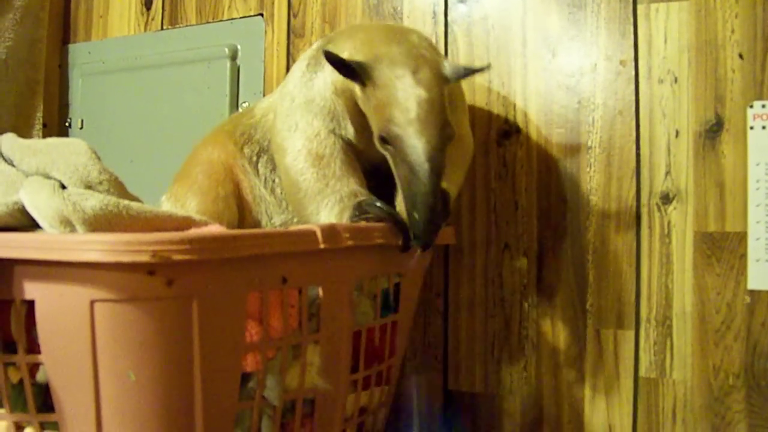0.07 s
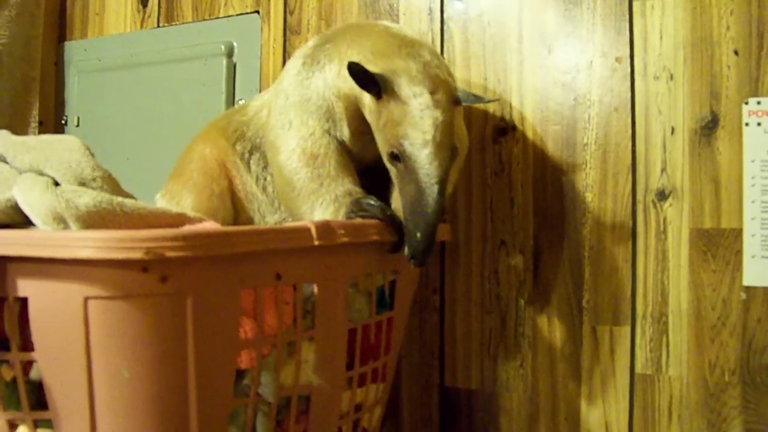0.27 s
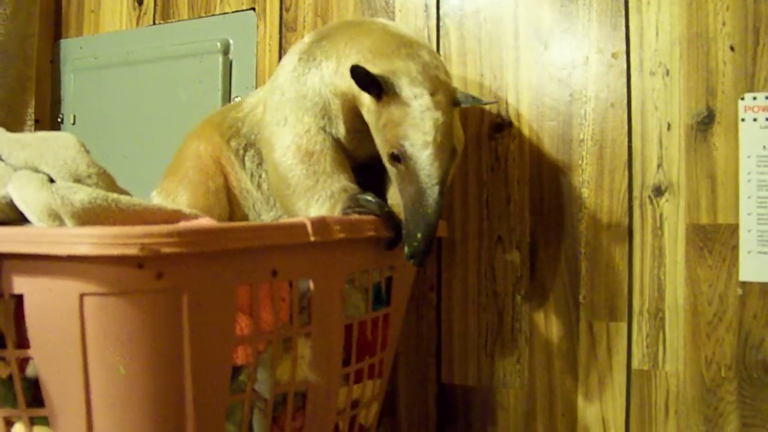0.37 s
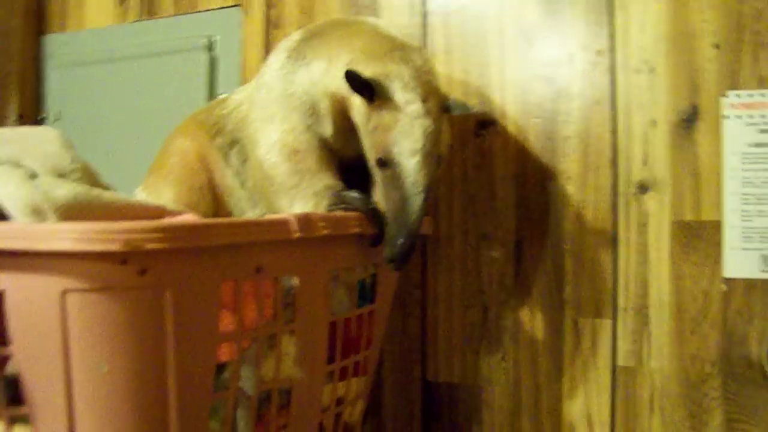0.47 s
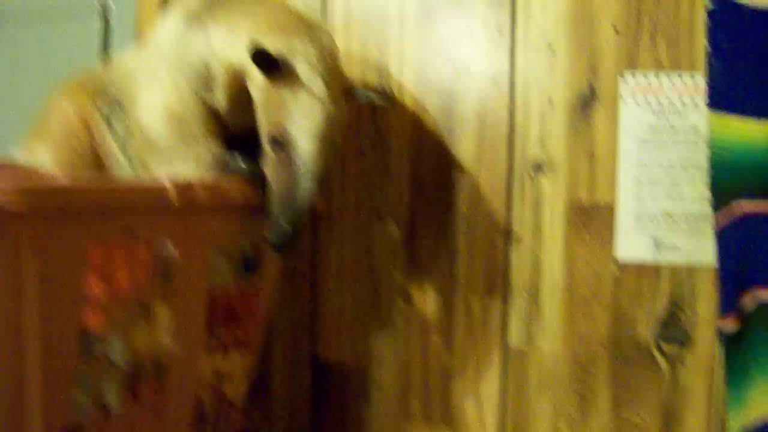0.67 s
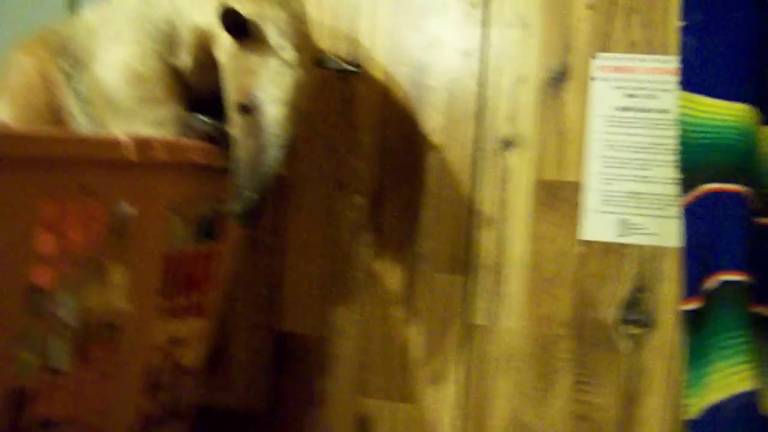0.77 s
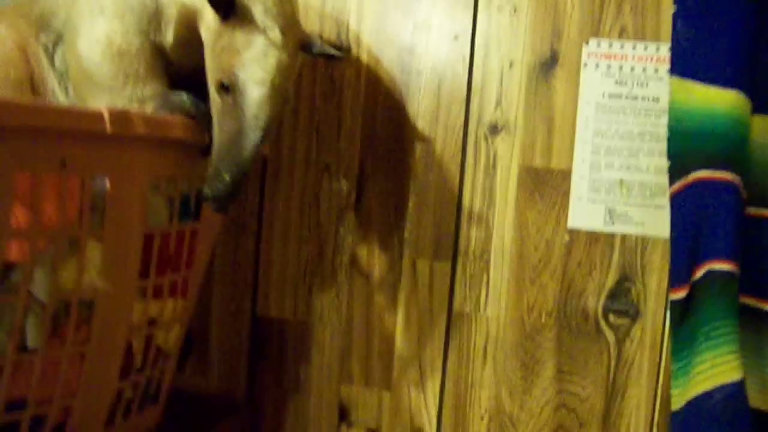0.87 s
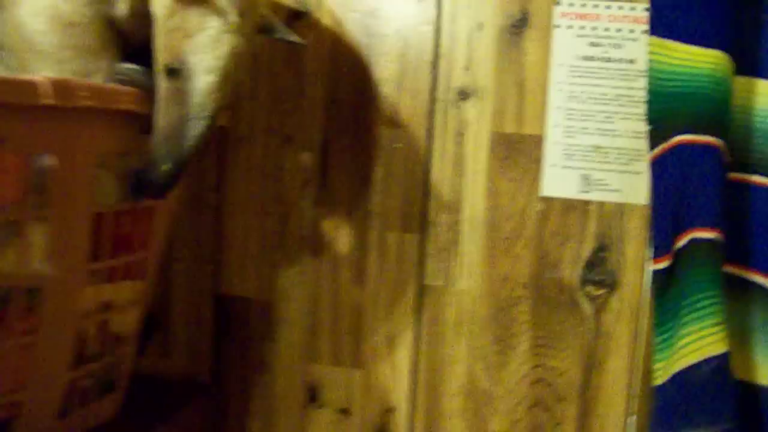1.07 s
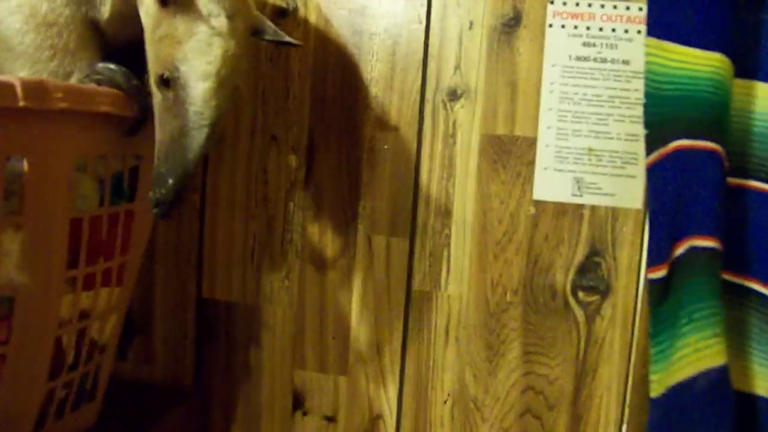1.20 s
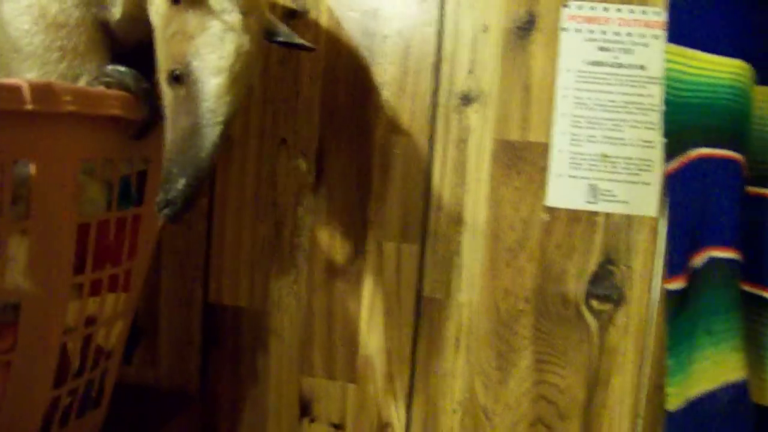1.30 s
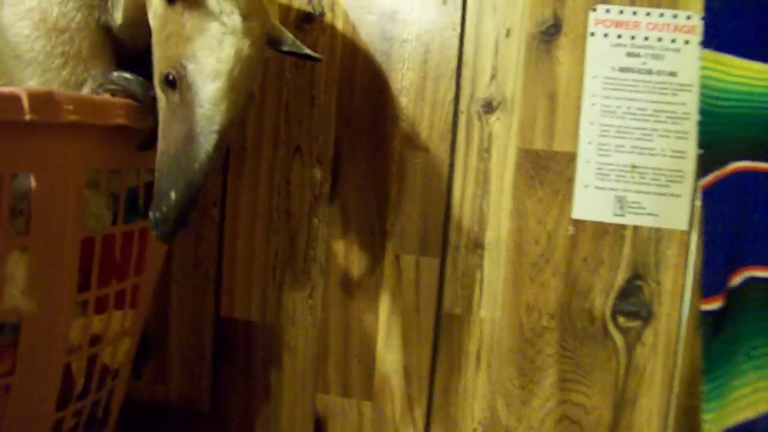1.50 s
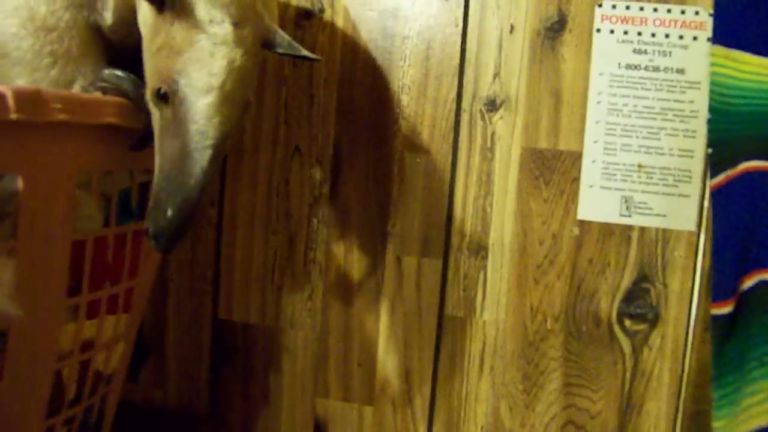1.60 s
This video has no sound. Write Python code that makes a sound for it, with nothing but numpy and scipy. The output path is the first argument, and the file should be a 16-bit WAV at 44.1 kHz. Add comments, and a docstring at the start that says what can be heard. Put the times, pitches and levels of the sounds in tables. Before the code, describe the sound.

An empty plastic bottle hits a hard floor at about 0.2 seconds and again near 0.5, with loud, hollow knocks that overload the microphone. It bounces more lightly and skids around 0.7 to 0.9 seconds, knocks again, then rattles quickly on its side, weakening until about 1.6 seconds. The small room adds a short echo, with a soft hush and a faint steady whine behind.

```python
"""An empty plastic bottle falls on a hard floor, bounces end over end and rattles on its side.
Each knock is a crack of the thin wall with a brief ring at the struck spot; the air inside answers
with a hollow note and the floor booms. Between bounces the bottle skids. The small, quiet room
echoes, a faint steady whine lies behind it all, and the two hardest knocks overload the microphone."""
import sys
import numpy as np
from scipy import signal
from scipy.fft import rfft, irfft
from scipy.io import wavfile
from scipy.ndimage import uniform_filter1d

SR = 44100
rng = np.random.default_rng(int(sys.argv[2]) if len(sys.argv) > 2 else 0)


def file_out(sig):
    """Save sig as 16-bit WAV at sys.argv[1]."""
    # one column per channel
    cols = np.atleast_2d(sig).T
    # limit, then scale
    lim = np.clip(cols, -1, 1)
    pcm = np.round(lim * 32767).astype(np.int16)
    wavfile.write(sys.argv[1], SR, pcm)


N = 72765
SIDES = np.array([[1], [-1]])  # left, right; a positive pan is louder on the left


def amp(db):
    """Turns decibels into a gain."""
    return 10 ** (np.asarray(db) / 20)


def read(points, hz):
    """Reads between a table's rows on a log-frequency axis."""
    f, value = np.transpose(points)
    return np.interp(np.log(hz + 1), np.log(f + 1), value)


def add(mix, start_s, sound):
    """Mixes a stereo sound in at a given time."""
    part = mix[:, round(start_s * SR):][:, :sound.shape[1]]
    part += sound[:, :part.shape[1]]


def causal(gain):
    """A filter with these gains that never sounds before the hit (minimum phase)."""
    log_gain = np.log(np.maximum(np.r_[gain, gain[-2:0:-1]], 1e-5))
    return np.exp(np.conj(signal.hilbert(log_gain)))[:len(gain)]


def rise(t, rise_s):
    """Swells from silence to full level."""
    return 1 - np.exp(-t / rise_s)


def fade(t, fade_s):
    """Dies away, losing 60 dB in each fade time."""
    return np.exp(-np.log(1000) * t / fade_s)


def ring(tones, t):
    """A sum of dying pure tones."""
    return sum(amp(db) * fade(t, fade_s) * np.sin(2 * np.pi * hz * t) for hz, db, fade_s in tones)


def low_pass(x, hz):
    """Cuts away the treble above a frequency."""
    return signal.oaconvolve(x, signal.firwin(121, hz, window=("kaiser", 8), fs=SR)[None], "same")


# how alike the room sounds on the left and right (frequency [Hz], likeness [0 to 1])
LIKENESS = [(100, 0.99), (500, 0.92), (1200, 0.29), (2500, 0), (7000, 0.091)]
def surround(a, b, hz):
    """Blends two unrelated noise spectra into sound that comes from all around."""
    same = np.clip(read(LIKENESS, hz), -1, 1)
    return np.array([a, same * a + np.sqrt(1 - same ** 2) * b])


# tone colour of the room's hush (frequency [Hz], relative level [dB])
HUSH_COLOUR = [(10, -19), (22, 1), (40, -14), (70, -13.5), (150, -23.5), (230, -13), (295, -29), (400, -19),
               (530, -18.5), (950, -23), (1300, -20.5), (1700, -29), (3300, -26.5), (5000, -35.5),
               (7200, -38), (8300, -58)]
def background(hush_db=-46.5, whine_hz=1249.5, whine_db=-50):
    """The room's soft hush and a thin steady whine."""
    hz = np.fft.rfftfreq(N, 1 / SR)
    noise = surround(*rfft(rng.standard_normal((2, N))), hz)
    hush = irfft(noise * amp(read(HUSH_COLOUR, hz)), N)
    whine = np.sqrt(2) * np.sin(2 * np.pi * whine_hz * np.arange(N) / SR)
    return amp(hush_db) * hush / hush.std() + amp(whine_db) * whine


# how long the room rings (frequency [Hz], fade time [s])
ROOM_FADE = [(100, 1), (260, 0.29), (700, 0.52), (2000, 0.42), (4500, 0.36), (7500, 0.37)]
# tone colour of that ringing (frequency [Hz], level [dB])
ROOM_COLOUR = [(100, 0), (170, 0), (290, -2.5), (370, -5), (600, -11.5), (1000, -8.5), (2000, -9),
               (4500, -13), (6500, -9.5), (8200, -17)]
def room(sound, onset_s=0.0095, pan_db=1):
    """Many echoes blur into a tail, each frequency dying at its own speed."""
    hz, t, noise = signal.stft(rng.standard_normal((2, SR)), SR, nperseg=512)
    hz = hz[:, None]
    fade_s = read(ROOM_FADE, hz)
    gain = amp(read(ROOM_COLOUR, hz)) * np.sqrt(2 * np.log(1000) / (fade_s * SR))
    tail = signal.istft(surround(*noise, hz) * fade(t, fade_s) * gain, SR, nperseg=512)[1]
    tail *= np.clip(np.arange(tail.shape[1]) / (onset_s * SR) - .5, 0, 1)
    return signal.fftconvolve(sound.mean(0)[None], tail, axes=1)[:, :N] * amp(SIDES * pan_db / 2)


# loudness of the skid (time [s], level [dB])
SKID_LEVEL = [(0.658, -54.5), (.70, -47), (0.719, -58), (.755, -76), (0.766, -38), (0.792, -48.5),
              (.83, -49.5), (0.882, -56), (0.899, -65)]
# its tone colour (frequency [Hz], relative level [dB])
SLIP_COLOUR = [(300, -28), (1500, 6.5), (3000, 3.5), (5200, 6.5), (7200, -1), (8300, -24)]
def skid(slips_per_s=2200, spread_db=4, pan_db=10):
    """Between bounces the plastic slides over the floor in many tiny slips."""
    slips = (rng.random(N) < slips_per_s / SR) * rng.choice([-1, 1], N)
    strength = amp(spread_db * np.minimum(rng.exponential(1, N), 3))
    colour = amp(read(SLIP_COLOUR, np.fft.rfftfreq(N, 1 / SR)))
    grit = irfft(rfft(slips * strength) * colour, N)
    level = amp(np.interp(np.arange(N) / SR, *np.transpose(SKID_LEVEL), left=-120, right=-120))
    return grit / grit.std() * level * amp(SIDES * pan_db / 2)


# the floor's tones (pitch [Hz], level relative to the thud [dB], fade time [s])
FLOOR_TONES = [(98.4, -65.5, 0.59), (123.5, -58.5, 0.13), (144.3, -63, 0.18)]
def floor_boom(t, thud_db):
    """The struck floor booms under the thud."""
    return amp(thud_db) * ring(FLOOR_TONES, t)


# the hollow bottle's higher tones, one list per column
# (pitch [Hz], level relative to the blow's body band [dB], fade time [s])
BODY_HZ = [347, 553, 712, 878, 1097, 1339]
BODY_DB = [-53, -58.5, -55, -60, -56, -62]
BODY_FADE_S = [0.34, 0.19, 0.24, 0.16, 0.33, .3]
def hollow_body(t, body_db):
    """The hollow bottle rings on softly after a blow."""
    return amp(body_db) * ring(zip(BODY_HZ, BODY_DB, BODY_FADE_S), t)


# tones of the air in the neck (pitch [Hz], relative level [dB], fade time [s])
AIR_TONES = [(185.53, 1.5, 0.47), (211.8, -8, 0.27), (141.7, -11.5, 0.36)]
def air_note(t, swell, apart_rad=0.083):
    """Spectrum of the air swinging in the neck, left and right slightly out of step."""
    return rfft(ring(AIR_TONES, t) * swell) * np.exp(.5j * SIDES * apart_rad)


# tones of the thin wall (pitch [Hz], relative level [dB], fade time [s])
WALL_TONES = [(1313, 11.5, 0.13), (1701.4, 10, 0.12), (2120, 0, .12), (2290, -4.5, .12), (2796, 6, 0.13),
              (2970, -1, .14), (3240, -0.5, 0.19), (4260, -5.5, .08), (3980, -10, 0.067)]
def wall_ring(t, wall_db, spot_tones, softness, base_rise_s=0.00078):
    """Spectrum of the ringing wall and the much shorter ring of the struck spot."""
    spot = [(hz, db, 0.012 * (2300 / hz) ** 0.54) for hz, db in spot_tones]  # high tones die sooner
    ringing = ring(spot, t) + amp(wall_db) * ring(WALL_TONES, t)
    return rfft(ringing * rise(t, base_rise_s * softness))


# centres of a blow's thud, body, clack and crack bands (frequency [Hz])
BLOW_BANDS = [150, 650, 2300, 5500]
# tone colour that all blows share (frequency [Hz], level [dB])
BLOW_COLOUR = [(30, -42.5), (70, -12.5), (130, 5.5), (225, 8), (295, -9.5), (370, -0.5), (700, -4),
               (880, -2), (970, -14), (1180, -2), (1500, -10), (2300, -4.5), (4500, -5), (7000, -8),
               (7900, -23), (9000, -36)]
def crack(t, hz, bands_db, softness, base_rise_s=0.00032, fade_s=0.033, push_hz=212):
    """Spectrum of the wall hitting the floor: a clean push in the bass, a burst of noise above."""
    shape = rise(t, base_rise_s * softness) * fade(t, fade_s)
    shared, apart = rfft(rng.standard_normal((2, len(t))) * shape / np.linalg.norm(shape))
    shared *= causal(uniform_filter1d(abs(shared) ** 2, size=201) ** -.5)  # evens out chance peaks
    push = np.exp(-(hz / push_hz) ** 2 / 2)
    width = 0.29 * np.minimum(hz / 2220, 1)  # left and right differ most in the treble
    burst = push + (1 - push) * shared + SIDES * width * apart
    force_db = read(list(zip(BLOW_BANDS, bands_db)), hz)
    return burst * causal(amp(force_db + read(BLOW_COLOUR, hz)))


def knock(air_db, thud_db, body_db, clack_db, crack_db, wall_db, hz1, db1, hz2, db2, pan_db):
    """One hit on the floor; gives the impact and the air's hollow note separately."""
    size, hard_db = 32768, 20.5
    t, hz = np.arange(size) / SR, np.fft.rfftfreq(size, 1 / SR)
    softness = amp(0.41 * (hard_db - max(clack_db, crack_db)))  # weaker blows set in more slowly
    swell = rise(t, rise_s=0.0063)
    impact = crack(t, hz, [thud_db, body_db, clack_db, crack_db], softness)
    impact += wall_ring(t, wall_db, [(hz1, db1), (hz2, db2)], softness)
    impact += rfft((hollow_body(t, body_db) + floor_boom(t, thud_db)) * swell)
    note = amp(air_db) * air_note(t, swell)
    pan = amp(SIDES * np.interp(hz, [1100, 2220], [-0.6, pan_db]) / 2)  # bass stays near the middle
    delay_s = np.array([[.00004], [0]])  # the left side hears it a little later
    delay = np.exp(-2j * np.pi * hz * delay_s)
    fade_out = np.minimum((t[-1] - t) / .1, 1)
    return irfft(np.array([impact, note]) * pan * delay) * fade_out


# each hit on the floor, with relative levels (time [s], air note [dB], thud [dB], body [dB],
# clack [dB], crack [dB], wall ring [dB], struck spot's pitch 1 [Hz], level 1 [dB],
# pitch 2 [Hz], level 2 [dB], treble pan [dB])
BOUNCES = [ (0.2252, -14.5, 27.5, 30, 29, 24, -28, 2480, 3, 1267, -12, 2),
           (.2520, -43, 21.5, 31, 14.5, 9, -46, 3870, 2.5, 3300, 1, 4),
           (0.468, -25.5, 21, 20, 18, 27, -51.5, 5083, 8, 1626, -5.5, 3),
           (0.4706, -53, 17, 3, -4, 11, -60, 6080, -4, 6280, 9.5, -2),
           (0.511, -41.5, 12.5, 17, 5, 12.5, -47, 1400, -19.5, 3260, -23.5, -3),
           (0.5812, -32, 11, 27, 19, 11, -42, 681, -9, 539, -8.5, 8),
           (0.6118, -34.5, 9.5, -3, 3, -12, -56.5, 1150, -44, 580, -41, 14.5),
           (0.678, -34, 0, -10.5, -7, -4, -48.5, 5750, -37, 4130, -36, 6.5),
           (0.7255, -36, 8, 16, 5, 3.5, -45.5, 1174, -12.5, 542, -19.5, 9),
           (0.7489, -53, 15, 1, 0.5, -4.5, -48, 1190, -24, 5800, -29, 6),
           (0.882, -60, -9, -14, 1.5, -3, -70, 2650, -24, 5150, -19, -11),
           (.8960, -19, 22.5, 17, 14.5, 15.5, -45.5, 1395, -9.5, 7150, -1.5, 10.5),
           (1.0239, -23.5, 20, 19.5, 16, 11.5, -47, 1820, -8, 1250, -10, 8.5),
           (1.0822, -41.5, 14, -11, -7, 3.5, -59, 3720, -21, 5800, -20, -3),
           (1.105, -35, 21, 17.5, 15, 16.5, -44.5, 3660, -6, 7110, -5.5, 11.5),
           (1.1971, -42.5, 15, 1, 12, 11, -48, 3040, -4.5, 2530, -13, 8),
           (1.2370, -27, 5, 2, -3, -11, -49.5, 2350, -20, 1770, -41, 10),
           (1.251, -38, 15.5, 6.5, 12.5, 8.5, -39.5, 1265, -23.5, 7100, -11, 10.5),
           (1.2564, -39, 9.5, 9, 4.5, 5, -48, 1410, -21.5, 4120, -16, -3),
           (1.3240, -38.5, 8, 7, 12.5, 2.5, -60.5, 1720, -16, 2345, -12.5, 5),
           (1.3628, -27.5, 17.5, 8.5, 14.5, 10.5, -47, 3225, -9.5, 4020, -9.5, 5.5),
           (1.4030, -30.5, 16.5, -6.5, 14, 3.5, -49.5, 1670, -21.5, 2340, -19, 6),
           (1.4280, -33.5, 11.5, -14, 8, -5, -49.5, 1770, -26, 3780, -19, 6.5),
           (1.4580, -29.5, -20, 10, 8, 3.5, -61, 2400, -35, 4250, -14.5, 4),
           (1.5087, -42.5, 16, -5, 5, 2, -55, 1320, -16.5, 4120, -13.5, 7.5),
           (1.5810, -36, -14, -2, 4.5, -2.5, -61, 2430, -44, 4220, -21.5, 4.5),
           (1.6100, -50, -11, -4.5, 2, -4.5, -56.5, 2436, -38, 3240, -25, 4.5),
           (1.634, -41, -13, 1.5, -2.5, -14, -61, 2334, -35, 3240, -41, 8)]
def bouncing_bottle():
    """The bottle lands again and again; gives the impacts and the hollow notes separately."""
    impacts, notes = np.zeros((2, 2, N))
    for start_s, *blow in BOUNCES:
        impact, note = knock(*blow)
        add(impacts, start_s, impact)
        add(notes, start_s, note)
    return impacts, notes


def scene():
    """The bottle bounces and skids in the quiet room."""
    impacts, notes = bouncing_bottle()
    clatter = impacts + skid()
    echo = np.zeros((2, N))  # off the floor, left and right swapped
    add(echo, start_s=.0066, sound=amp(-26) * clatter[::-1])
    return clatter + notes + echo + room(clatter) + background()


def record(dry, treble_edge_hz=8600, overload=1.0, top_hz=16000):
    """The highest treble is cut away and the hardest knocks clip."""
    clipped = np.clip(low_pass(dry, treble_edge_hz), -overload, overload)
    return low_pass(clipped, top_hz)


dry = scene()
out = record(dry)
file_out(out)
```